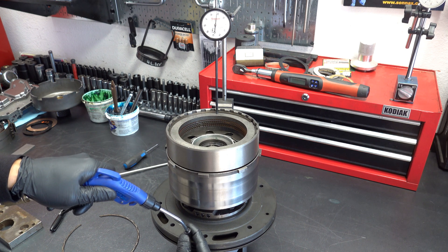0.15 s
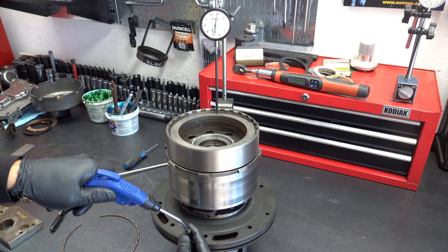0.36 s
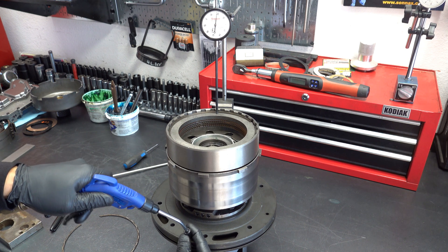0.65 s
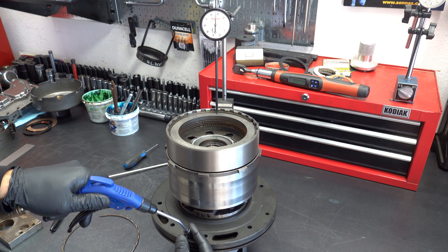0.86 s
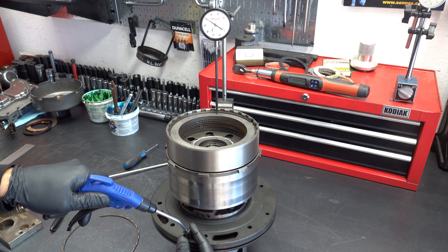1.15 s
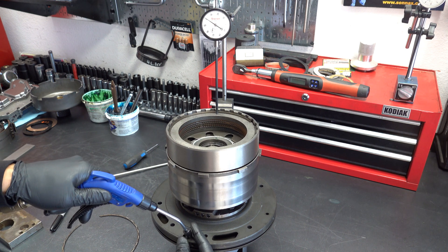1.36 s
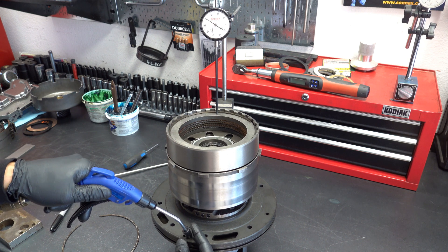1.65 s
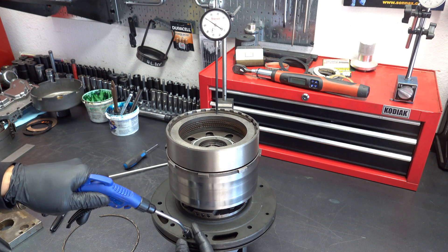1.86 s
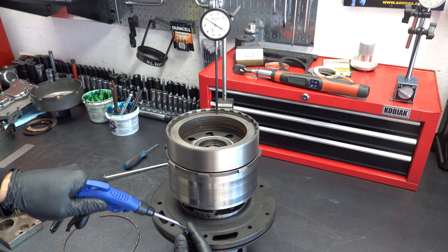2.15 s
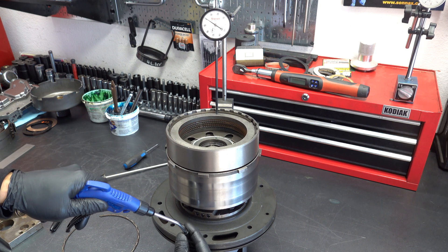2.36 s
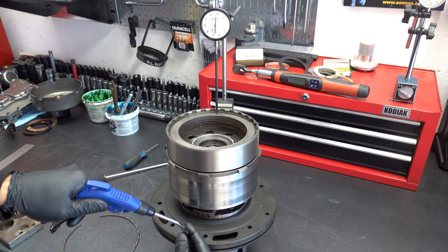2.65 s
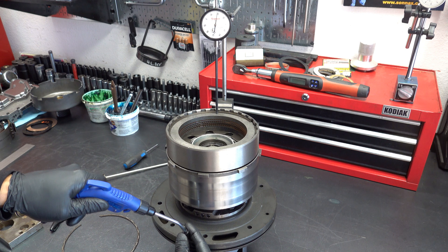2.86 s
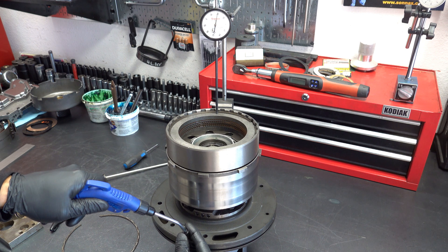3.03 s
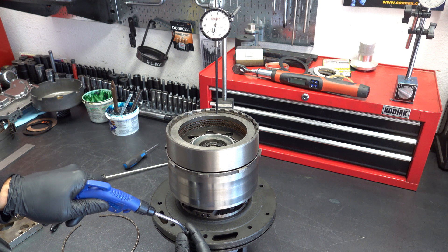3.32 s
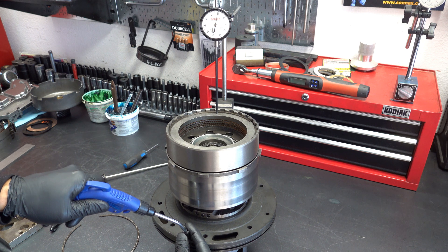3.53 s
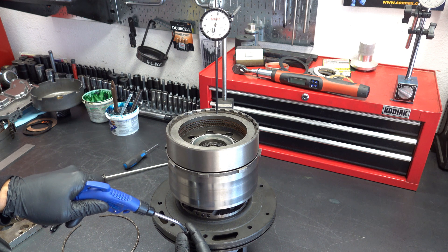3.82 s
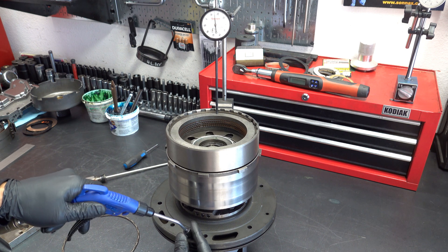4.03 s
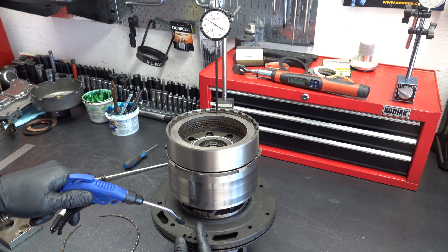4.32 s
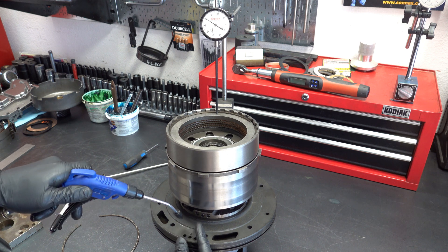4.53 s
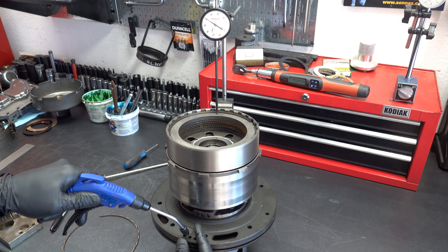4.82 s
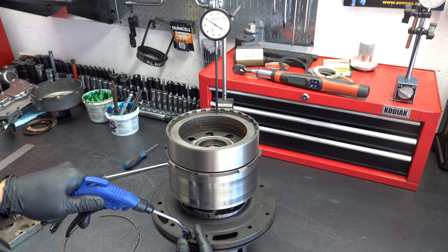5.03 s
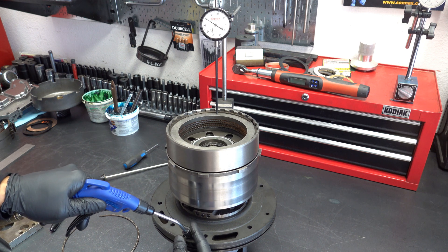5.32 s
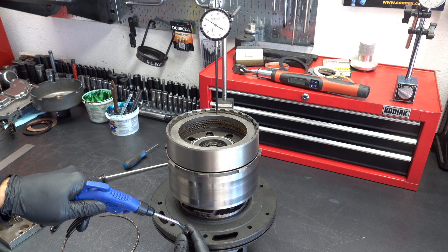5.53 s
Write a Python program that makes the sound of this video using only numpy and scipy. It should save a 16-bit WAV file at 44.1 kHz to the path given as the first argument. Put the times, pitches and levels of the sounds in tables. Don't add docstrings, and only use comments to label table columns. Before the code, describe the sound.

In a workshop, an air gun blasts bright hiss for about a second, slips and ends with a pop and quick venting sigh. Quiet leak and fan noise follow. Then a hard metallic clunk and second lighter knock start a muffled, hollow airflow in a steel drum. It ends with a bright spurt, a pop and a fluttering whistling release, back to quiet. Close mono microphone, background ducking under the jet.

```python
import sys
import numpy as np
from scipy import signal
from scipy.fft import rfft, irfft
from scipy.io import wavfile
from scipy.ndimage import uniform_filter1d

SR = 44100
rng = np.random.default_rng(int(sys.argv[2]) if len(sys.argv) > 2 else 0)


def inscribe(sig):
    pcm = np.round(np.clip(np.atleast_2d(sig).T, -1, 1) * 32767)
    wavfile.write(sys.argv[1], SR, pcm.astype(np.int16))


def how_loud(loudness_db):
    steps = np.asarray(loudness_db, float) / 20
    return 10 ** steps


N = 250488

# start [t/s], end [t/s], first rumble change [level/dB]
QUIET = [
    (1.3, 2.51, -3),
    (4.5, 5.64, 2.2),
]


def evened(x):
    return x / np.sqrt(np.mean(x ** 2) + 1e-20)


def read(points, hz):
    f, value = np.transpose(points)
    return np.interp(np.log(hz + 1), np.log(f + 1), value)


def add(mix, s, sound):
    part = mix[max(round(s * SR), 0):][:len(sound)]
    part += sound[:len(part)]


def colour_db(spectrum, rings, hz):
    peaks_db = sum(db / (1 + (2 * (hz - f) / width) ** 2) for f, width, db in rings)
    return read(spectrum, hz) + peaks_db


def noise(field_db, size, patchy_db, flicker_db):
    real, imag, patches = rng.standard_normal((*field_db.shape[::-1], 3)).T
    patches = uniform_filter1d(uniform_filter1d(patches, size=9, axis=0), size=9, axis=1)
    flicker = evened(uniform_filter1d(rng.standard_normal(field_db.shape[1]), size=3))
    level_db = field_db + patchy_db * evened(patches) + flicker_db * flicker
    z = (real + 1j * imag) * how_loud(level_db)
    return signal.istft(z, nperseg=size, noverlap=size * 3 // 4)[1][:N]


def steady(spectrum, rings, size, patchy_db):
    db = colour_db(spectrum, rings, np.fft.rfftfreq(size, 1 / SR))
    return evened(noise(db[:, None] + np.zeros(4 * N // size + 5), size, patchy_db, 0))


def resonate(x, hz, width):
    turn = np.exp(2j * np.pi * np.cumsum(hz * np.ones(len(x))) / SR)
    pole = np.exp(-np.pi * width / SR)
    return 2 * (turn * signal.lfilter([1 - pole], [1, -pole], x / turn)).real


def jet(rows, spectrum, rings, from_hz, to_hz, patchy_db, flicker_db):
    hz, t = np.fft.rfftfreq(1024, 1 / SR), np.arange(N // 256 + 5) * 256 / SR
    s, level_db, treble_db, body_db = np.transpose(rows)
    db = colour_db(spectrum, rings, hz)

    def band_db(lo, hi):
        return 10 * np.log10(np.sum(how_loud(db[(hz > lo) & (hz < hi)]) ** 2))

    middle, high, low = band_db(from_hz, to_hz), band_db(8500, 15500), band_db(900, 2600)
    treble = np.outer(read([(6000, 0.015), (10000, 1)], hz), np.interp(t, s, treble_db) - high + middle)
    treble += np.outer(read([(10500, 0), (14000, 0.3)], hz), np.interp(t, s, treble_db - treble_db.mean()))
    body = np.outer(read([(2400, 0.91), (3200, 0.12)], hz), np.interp(t, s, body_db) - low + middle)
    air = noise((db - middle)[:, None] + treble + body, 1024, patchy_db, flicker_db)
    time = np.arange(N) / SR
    valve = np.interp(time, [s[0] - 0.005, s[0] + 0.005, s[-1] - 0.025, s[-1]], [0, 1, 1, 0])
    return how_loud(-0.5 + np.interp(time, s, level_db)) * valve * air


def open_flow(rows):
    # t/s, treble change [level/dB], length [t/s]
    treble_dips = [
        (0.688, -6, 0.022),
        (0.883, -6, 0.017),
        (0.942, -6, 0.015),
        (4.043, -4, 0.036),
    ]
    bright_for_s, dulls_db_per_s = 0.63, 10
    at, level_db, lift = np.transpose(rows)
    s = np.arange(at[0], at[-1], 1 / 500)
    treble_db = 1.2 - dulls_db_per_s * np.maximum(s - at[0] - bright_for_s, 0)
    treble_db = treble_db + sum(db * np.exp(-((s - when) / length) ** 2) for when, db, length in treble_dips)
    body_db = -0.9 - 16 * np.interp(s, at, lift)
    return np.transpose([s, np.interp(s, at, level_db), treble_db, body_db])


def open_jet():
    # t/s, level/dB, nozzle lift [0-1]
    blasts = [
        [(0.0, -17, 0.11), (0.09, -18.5, 0), (0.53, -17.5, 0.49), (0.7, -17.5, 0.3), (0.8, -17, 0.53),
         (0.9, -18, 0.11), (0.95, -16.5, 0.07), (0.985, -20, 0.1)],
        [(3.93, -34, 0.1), (3.99, -24, 0), (4.02, -14.5, 0.1), (4.055, -14, 0.5), (4.075, -15, 0.95),
         (4.095, -20, 0.5), (4.115, -22, 0.3)],
    ]
    # f/Hz, density [level/dB per Hz]
    spectrum = [(88, -65), (150, -32.5), (861, -23.5), (1130, -12.5), (1910, -8.5), (2320, -5), (2980, -9),
                (3840, -0.5), (4940, -4), (8020, -4), (10700, -7.5), (11600, -11.5), (15500, -13.5)]
    # f/Hz, width [f/Hz], lift [level/dB]
    rings = [(1133, 150, 4), (2370, 340, 4.5), (3780, 510, 4), (4130, 200, 2.5), (5810, 560, 5.5),
             (7880, 960, 4.5), (9440, 300, 2.5), (10100, 500, -3), (13000, 800, 2.5)]
    return sum(jet(open_flow(rows), spectrum, rings, 5680, 8800, patchy_db=1.1, flicker_db=-0.6)
               for rows in blasts)


def bursts():
    # t/s, level/dB, centre [f/Hz], width [f/Hz], length [t/s]
    gusts = [(.68, -12.5, 4220, 1200, 0.035), (0.64, -33, 2330, 200, 0.12), (.803, -15, 4250, 900, 0.014),
             (.828, -15.5, 4100, 2000, 0.017), (0.865, -17, 5650, 900, .03),
             (1.125, -18, 4500, 1100, 0.062), (2.66, -38, 15400, 500, .15), (2.64, -39, 13700, 1200, .16),
             (4.83, -47, 2270, 350, .04), (4.14, -17.5, 5300, 1600, 0.053), (4.222, -17, 4900, 2900, 0.032),
             (4.294, -18.5, 3900, 1200, 0.032), (.958, -27, 600, 1030, 0.022),
             (3.914, -22, 3900, 3400, .04)]
    # t/s, hiss [level/dB], thump [level/dB], length [t/s]
    pops = [
        (.960, -5, -12, 0.0083),
        (4.101, -5, -22.5, 0.0038),
        (4.012, -11, -32, 0.0065),
        (4.044, -8, -42, 0.0063),
    ]
    out, t = np.zeros(N), np.arange(-8000, 8000) / SR
    for s, db, hz, width, length in gusts:
        puff = evened(resonate(resonate(rng.standard_normal(len(t)), hz, width), hz, width))
        add(out, s + t[0], how_loud(db) * puff * np.exp(-(t / length * 2) ** 2))
    for s, hiss_db, thump_db, length in pops:
        spray = resonate(np.diff(rng.standard_normal(len(t) + 1)), 4500, 6000)
        hiss = evened(resonate(spray, 4700, 6000)) * np.exp(-(t / length * 2) ** 2)
        swing = t / np.where(t < 0, 0.002, 0.0038)
        thump = swing * np.exp(-swing ** 2)
        add(out, s + t[0], how_loud(hiss_db) * hiss + how_loud(thump_db) * thump)
    return out


def sealed_flow():
    # t/s, level/dB, t60 [t/s]
    jolts = [
        (2.542, -18.5, 0.075),
        (2.585, -33, .1),
        (2.612, -35, 0.06),
        (2.69, -20, 0.045),
    ]
    start_s, end_s, climb_db, fill_time_s = 2.535, 4.07, 14.5, 0.25
    s = np.arange(start_s, end_s, 1 / 500)
    short_db = climb_db * np.exp(-(s - start_s) / fill_time_s)
    flow = how_loud(-20.5 - short_db) ** 2
    puffs = sum(how_loud(db - 60 * np.where(s > at, (s - at) / t60, (at - s) / 0.026)) ** 2
                for at, db, t60 in jolts)
    share = puffs / (flow + puffs)
    treble_db = (1 - share) * (-3 + 0.4 * short_db) + share * -17
    body_db = 0.83 + share * 3.5
    return np.transpose([s, 10 * np.log10(flow + puffs), treble_db, body_db])


def sealed_drum():
    # f/Hz, density [level/dB per Hz]
    spectrum = [(88, -49), (150, -23), (308, -19.5), (561, -12.5), (877, -8), (1170, -5.5), (1940, -6.5),
                (2360, -4.5), (3410, -9.5), (4480, -8.5), (7570, -16), (8670, -17), (15500, -29.5)]
    # f/Hz, width [f/Hz], lift [level/dB]
    rings = [(431, 21, 11), (566, 52, 8), (990, 22, 6), (1160, 28, 4), (1540, 66, 4), (1720, 27, 7.5),
             (2080, 53, 6.5), (2385, 200, 3), (4100, 110, 5), (4470, 300, 6), (6170, 200, 6.5),
             (8660, 540, 9.5), (10000, 650, 6), (11050, 300, 2.5), (14400, 220, 6)]
    return jet(sealed_flow(), spectrum, rings, 2860, 7300, patchy_db=0.55, flicker_db=0.48)


def clunks():
    # t/s, peak [level/dB], favoured f/Hz, crack [level/dB]
    knocks = [(2.5365, -20, 2300, -30), (2.5416, -2, 2400, -12), (2.5427, -7, 256, -14),
              (2.544, -4, 695, -5), (2.5477, -6, 603, -6), (2.553, -6, 1000, -11),
              (2.5548, -2.5, 1540, -14), (2.5598, -16, 1390, -13), (2.570, -14, 1300, -16),
              (2.585, -11, 1500, -18), (2.604, -12, 1200, -20), (2.610, -11, 900, -18),
              (2.615, -9, 340, -23), (2.6826, -14, 705, -20), (2.685, -12, 302, -16),
              (2.6884, -10.5, 1010, 0), (2.6907, -10, 506, -1), (2.6945, -8.5, 900, -4),
              (4.008, -16, 450, -10)]
    # f/Hz, level/dB, t60 [t/s]
    steel = [(236, -4.5, 0.039), (410, -3, 0.021), (610, 3.5, 0.0094), (815, -4.5, 0.023),
             (1010, -2, 0.018), (1290, -6, 0.0096), (1560, 3, 0.016), (1970, -3, 0.019),
             (2400, -2.5, 0.028), (2800, -2, 0.014), (3410, 0.5, 0.022), (5060, 1, 0.026), (5840, -1, .02),
             (6950, 1, 0.029)]
    out, t = np.zeros(N), np.arange(4000) / SR
    hz, db, t60 = np.transpose(steel)[:, :, None]
    for s, peak_db, best_hz, crack_db in knocks:
        chance = rng.standard_normal((3, len(steel), 1))
        lift_db = -9.0 * abs(np.log2(hz / best_hz)) + 0.65 * chance[0]
        turns = hz * (1 + 0.023 * chance[1]) * t + chance[2]
        modes = how_loud(db + lift_db - 60 * t / t60) * np.sin(2 * np.pi * turns)
        ring = modes.sum(0) * (1 - np.exp(-t / 0.00055))
        crack = how_loud(crack_db - 60 * t / 0.013) * np.diff(rng.standard_normal(len(t) + 1))
        crack = resonate(resonate(resonate(crack, 6400, 3400), 5500, 5300), 5000, 5000)
        add(out, s, how_loud(peak_db) * (ring / abs(ring).max() + 1.14 * crack))
    return out


def vent_flow(start, hold, level_db, body_db, sparkle_db):
    swell_db, fall_db_per_s, knee_s, tail_s = 3, 192, 0.032, 0.225
    settled_body_db, settles_s, dulls_db_per_s = -5.5, 0.027, 55
    t = np.arange(0, hold + tail_s, 1 / 500)
    falling_s = np.hypot(np.maximum(t - hold, 0), knee_s) - knee_s
    db = level_db + swell_db * np.minimum(t / hold, 1) - fall_db_per_s * falling_s
    fresh = np.exp(-t / settles_s)
    treble_db = -3 + sparkle_db * fresh - dulls_db_per_s * t
    body = settled_body_db + (body_db - settled_body_db) * fresh
    return np.transpose([start + t, db, treble_db, body])


def vents():
    flows = [
        (0.951, 0.17, -17.5, -1.5, 4.5),
        (4.098, 0.21, -18.5, -16, 5.5),
    ]
    # f/Hz, density [level/dB per Hz]
    colours = [
        [(88, -47), (150, -13.5), (352, -22), (428, -20), (895, -10), (967, -9.5), (1700, -2), (2760, -5),
         (4070, 2.5), (9740, -12.5), (15500, -28)],
        [(88, -53), (150, -25), (248, -20), (480, -23.5), (656, -17.5), (1370, -10), (2100, -7), (2500, -11),
         (4230, -4), (10500, -26), (15500, -42)],
    ]
    # f/Hz, width [f/Hz], lift [level/dB]
    rings = [(1440, 300, 0), (4200, 710, 1), (5200, 340, 0.5), (7850, 1100, 2.5)]
    return sum(jet(vent_flow(*rows), colour, rings, 2300, 8300, patchy_db=2.04, flicker_db=0.5)
               for rows, colour in zip(flows, colours))


def whistle(rows, width):
    s, hz, db = np.transpose(rows)
    t = np.arange(s[0], s[-1], 1 / SR)
    pitch = np.interp(t, s, hz)
    tone = resonate(resonate(rng.standard_normal(len(t)), pitch, width), pitch, width)
    out = np.zeros(N)
    add(out, s[0], how_loud(np.interp(t, s, db)) * evened(tone) * signal.windows.tukey(len(t), 0.04))
    return out


def port_whistles():
    # t/s, pitch [f/Hz], level/dB
    bore = [(2.58, 2394, -29), (2.645, 2435, -27), (2.668, 2420, -20.5), (2.71, 2400, -51),
            (2.82, 2385, -35), (3.3, 2374, -27.5), (3.6, 2370, -27.5), (3.8, 2385, -29), (4.02, 2400, -25)]
    # t/s, pitch [f/Hz], level/dB
    port = [(4.095, 2140, -27), (4.109, 2160, -17), (4.143, 2090, -23), (4.165, 2020, -11.5),
            (4.193, 2080, -29), (4.251, 2080, -16.5), (4.33, 2080, -25), (4.44, 2030, -41)]
    return whistle(bore, 56) + whistle(port, 300)


def air_dip(air):
    # f/Hz, change [level/dB]
    dip_curve = [(10900, 0), (11400, -5.5), (12500, -2), (15000, -1)]
    return irfft(rfft(air) * how_loud(read(dip_curve, np.fft.rfftfreq(N, 1 / SR))), N)


def workshop(x):
    # f/Hz, t60 [t/s]
    decay = [(200, 0.21), (1000, 0.65), (4000, 0.45), (12000, 0.32)]
    taps = np.zeros(SR)
    at = np.arange(300, SR - 20, 20)
    taps[at + rng.integers(0, 20, len(at))] = rng.choice([-1., 1.], len(at))
    hz, t, z = signal.stft(taps, SR, nperseg=256)
    tail = signal.istft(z * how_loud(-60 * t / read(decay, hz)[:, None]), SR, nperseg=256)[1]
    return signal.fftconvolve(x, tail / np.linalg.norm(tail))[:N]


def gain_control(t, ducks, dips_db, creep_db_per_s):
    # start [t/s], end [t/s], depth [level/dB]
    ducking = [
        (0, 0.968, -22),
        (4.043, 4.14, -22),
    ]
    fall_s, recover_s = 0.016, 0.095
    duck_db = sum(db * np.exp(-np.maximum(a - t, 0) / fall_s - (np.maximum(t - b, 0) / recover_s) ** 2)
                  for a, b, db in ducking)
    creep_db = sum((t > a - 0.2) * (t < b) * (db + creep_db_per_s * np.maximum(t - a, 0))
                   for (a, b, _), db in zip(QUIET, dips_db))
    return ducks * duck_db + uniform_filter1d(creep_db, size=4000, mode="nearest")


def drone(hz, wander):
    drift = evened(uniform_filter1d(uniform_filter1d(rng.standard_normal(N), size=9000), size=9000))
    return np.sqrt(2) * np.sin(2 * np.pi * (hz * np.arange(N) / SR + wander * drift))


def leak_and_fan(t):
    # f/Hz, density [level/dB per Hz]
    spectrum = [(76, -34), (130, -2), (295, -7.5), (368, -7), (423, -2.5), (517, -11.5), (583, -7),
                (684, -16), (1650, -19), (2270, -19), (2460, -19.5), (4140, -14), (5940, -16.5),
                (9040, -17), (15500, -32.5)]
    # f/Hz, width [f/Hz], lift [level/dB]
    rings = [(241, 51, 0.5), (424.6, 27, 8.5), (4420, 900, 3.5)]
    leak = steady(spectrum, rings, size=1024, patchy_db=0.86)
    reflected = workshop(np.diff(leak, prepend=0))
    shop = how_loud(-34.5) * evened(leak + 0.58 * reflected)
    hum = how_loud(-46) * drone(120, wander=0.16)
    return how_loud(gain_control(t, 1, dips_db=(-2.5, -1.4), creep_db_per_s=2)) * (shop + hum)


def floor_rumble(t):
    # t/s, lift [level/dB], length [t/s]
    heaves = [(1.19, 8, 0.1), (1.798, 3.5, .06), (2.674, 8, 0.046), (2.842, 7, 0.13), (3.28, -1, 0.068),
              (3.426, 6, 0.098), (3.956, 6, 0.15), (4.28, 6, 0.055), (4.46, 8, 0.042), (5.24, 0, 0.26)]
    # f/Hz, density [level/dB per Hz]
    spectrum = [(8, -30), (12, 7), (25, -5), (45, -13), (75, -0.5), (95, -23), (140, -23), (250, -60)]
    # f/Hz, width [f/Hz], lift [level/dB]
    rings = [(56, 15, 2)]
    # f/Hz, level/dB
    motors = [(53.6, -4.5), (60, -6.5)]
    rumble = how_loud(-3.5) * steady(spectrum, rings, size=8192, patchy_db=2.0)
    rumble = rumble + sum(how_loud(db) * drone(hz, wander=0.27) for hz, db in motors)
    heave_db = -39.5 + sum(db * np.exp(-((t - s) / length) ** 2) for s, db, length in heaves)
    dips_db = [row[-1] for row in QUIET]
    return rumble * how_loud(heave_db + gain_control(t, 0.87, dips_db, creep_db_per_s=6))


def scene():
    air = open_jet() + bursts() + sealed_drum() + vents() + port_whistles()
    air = air_dip(air)
    metal = clunks()
    reverberant = workshop(how_loud(-10.0) * air + how_loud(-6.0) * metal)
    t = np.arange(N) / SR
    mono = air + metal + reverberant + leak_and_fan(t) + floor_rumble(t)
    return np.array([mono, mono])


def top_cut(x):
    return signal.sosfilt(signal.butter(12, 15760, fs=SR, output="sos"), x)


def record(dry):
    edge_hz = 15760
    passed = np.fft.rfftfreq(N, 1 / SR) < edge_hz
    limited = irfft(rfft(np.clip(dry, -1, 1)) * passed, N)
    mix = np.clip(limited, -1, 1)
    return top_cut(mix)


dry = scene()
out = record(dry)
inscribe(out)
```